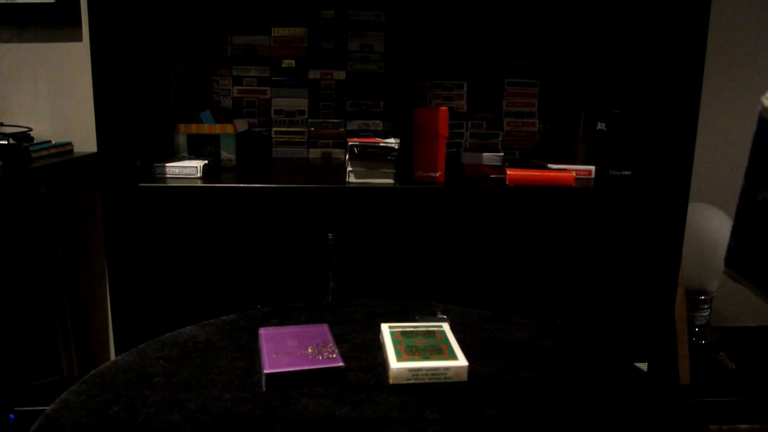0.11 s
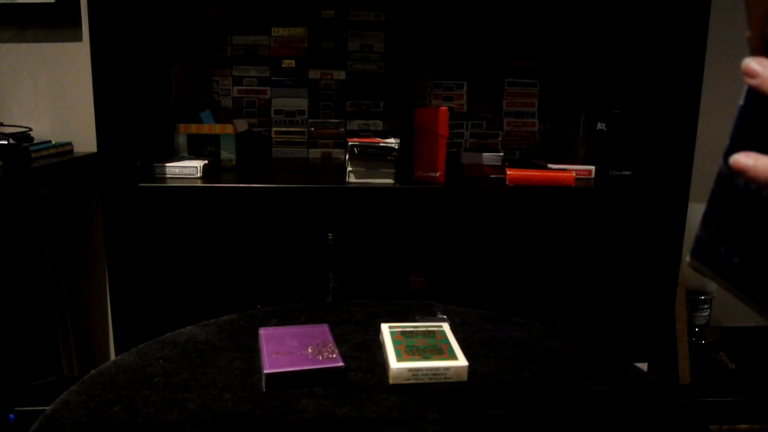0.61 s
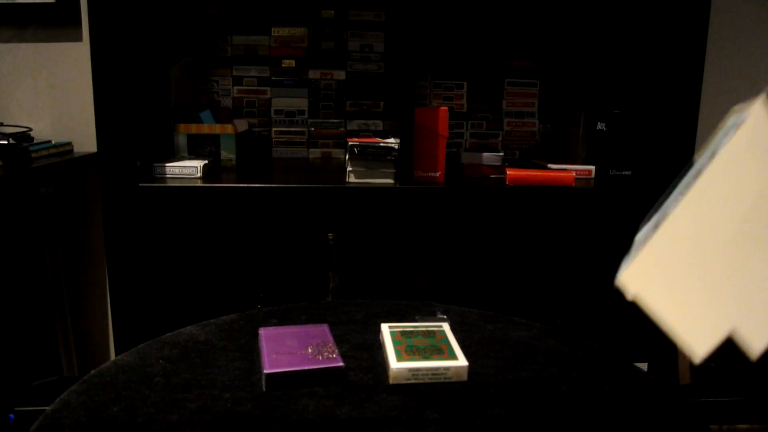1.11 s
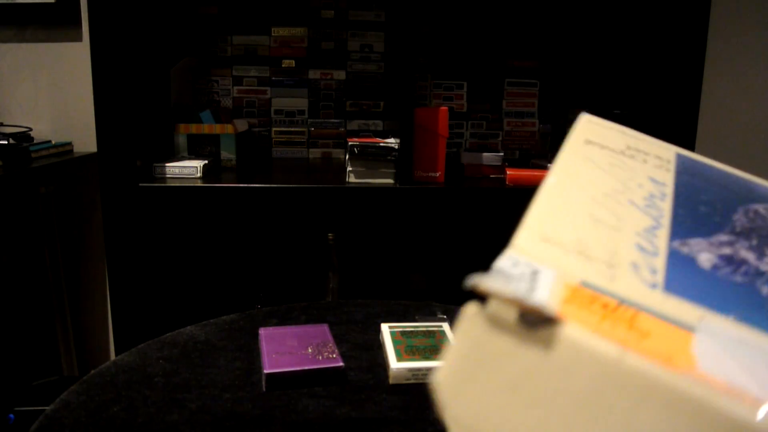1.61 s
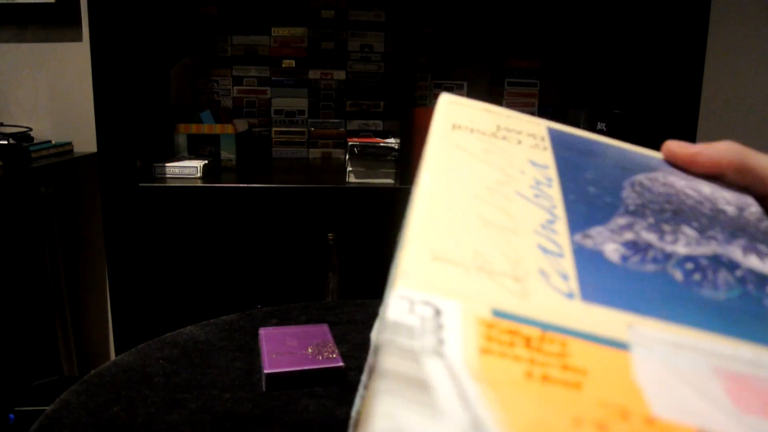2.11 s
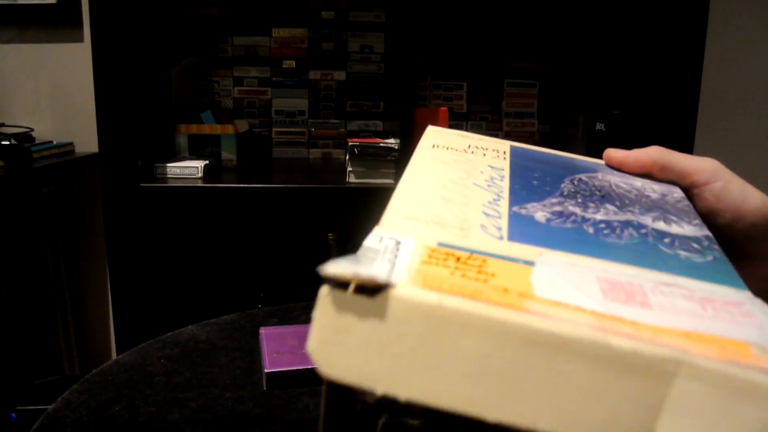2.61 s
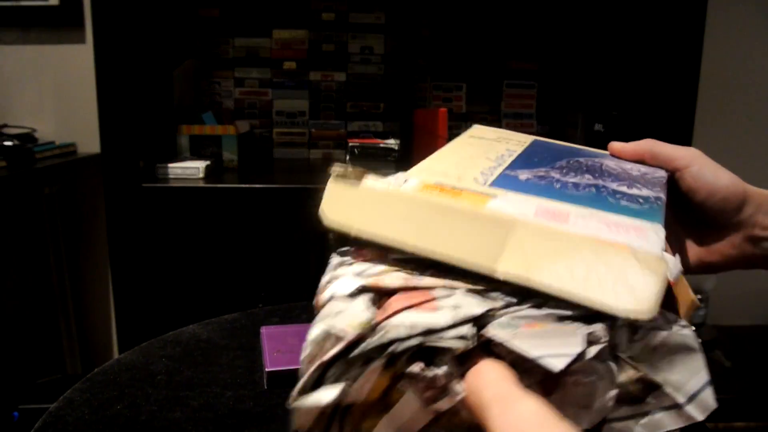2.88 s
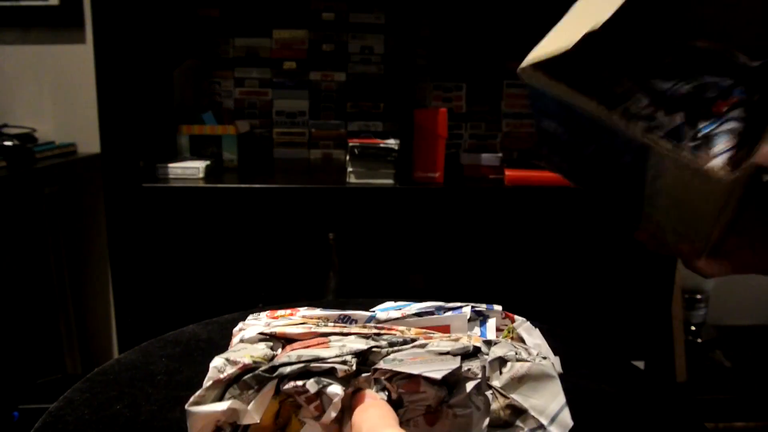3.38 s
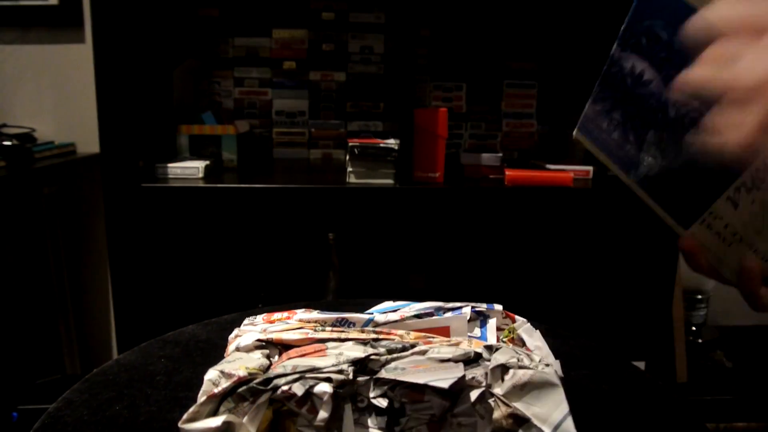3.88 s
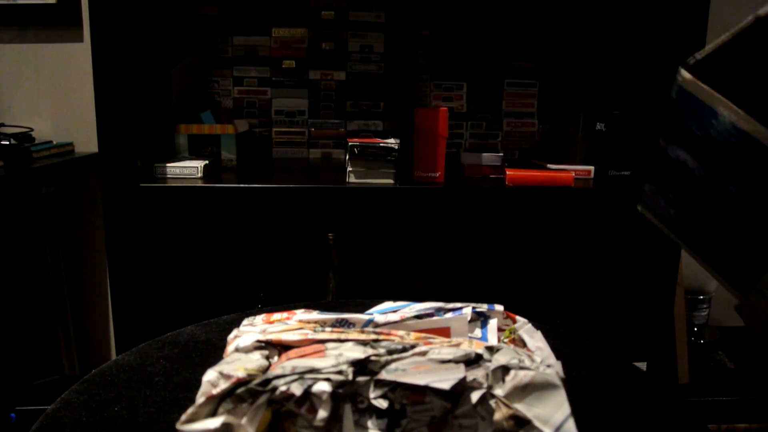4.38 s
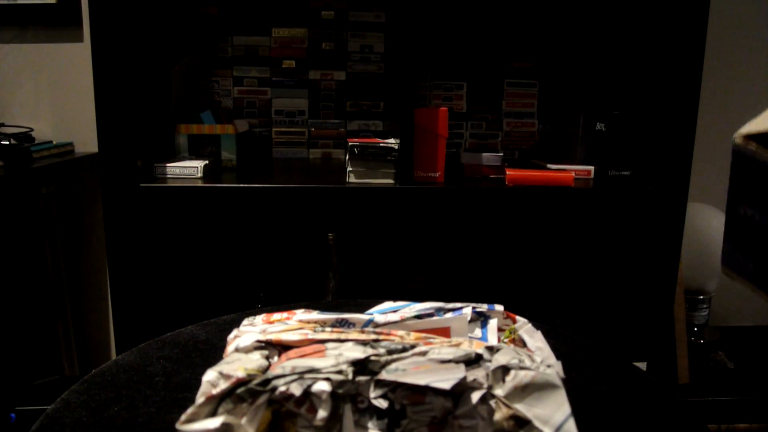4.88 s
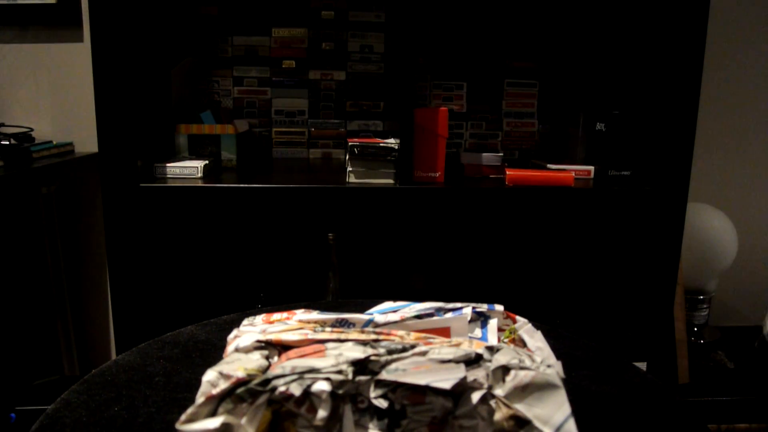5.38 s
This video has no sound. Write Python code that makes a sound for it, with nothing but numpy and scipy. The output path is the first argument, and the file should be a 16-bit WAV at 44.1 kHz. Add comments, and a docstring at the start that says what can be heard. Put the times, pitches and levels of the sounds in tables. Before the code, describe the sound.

A quiet indoor room with barely audible air, miked closely in stereo, sound leaning right. From 0 to 1 s a cardboard box is handled: faint dry rustles, small hollow knocks around 0.1, 0.3 and 0.8. A fuller bump comes at 1.1, then bright paper snaps near 1.26 and a crinkling cluster at 1.7. From 2 s crumpled newspaper is drawn out in a fine, irregular treble hiss, swelling until about 2.9, with hard crackles at 2.7-2.85. It drops off by 3.05, leaving light ticks and soft rustle, moving toward the middle, until 3.8. At 4.03 firm low-mid box knocks and a tiny groan start a rasping slide, with another bump at 4.28, fading by 4.5. After near silence, paper hiss returns at 4.75; from 5.0 to 5.5 hollow knocks, rough scrapes and rustles crowd together, strongest around 5.15 and 5.4, ending mid-movement.

```python
"""Paper hisses finely over card, a little right of the middle, close up in a quiet room.
A hand turns a cardboard box over and draws a wad of crumpled newspaper out of it, then slides the box aside.
Hiss and rustle are stick-slip noise, sheets snap and crackle as short rings, and scrapes and knocks
ring the modes of the hollow box, which also booms, thuds and groans.
Two close microphone ports hear the box come from the right to the middle and go back."""
import sys
import numpy as np
from scipy import signal
from scipy.io import wavfile
from scipy.ndimage import map_coordinates

SR = 44100
rng = np.random.default_rng(int(sys.argv[2]) if len(sys.argv) > 2 else 0)


def materialize(psi):
    """Save the field psi as 16-bit PCM at rate SR to the path in sys.argv[1].

    A 1-D psi becomes a single channel; in a 2-D psi each row is a channel.
    """
    bounded = np.clip(np.atleast_2d(psi).T, -1, 1)
    quanta = np.round(bounded * 32767).astype(np.int16)
    wavfile.write(sys.argv[1], SR, quanta)


def elevation(decibels):
    """Turn decibel levels (scalar or array-like) into linear amplitude ratios."""
    levels = np.asarray(decibels, float)
    return 10 ** (levels / 20)


N = 242792   # samples

# where the box is between the ports: [time_s, left_minus_right_db]
BOX_PLACE = [(0.0, -3.5), (0.32, -3.5), (1.03, -3.5), (1.85, -2.5), (2.47, -2), (3.5, -1), (3.9, 0.5),
             (4.0, -3.5), (5.5, -3.5)]
# spectrum of still air: [frequency_hz, relative_density_db]
AIR_SPECTRUM = [(15, -49), (25, -6), (510, -3), (1120, -6.5), (1730, -7), (3700, -12), (11600, -15.5),
                (15200, -18), (16500, -32)]
# power share that both ports hear alike: [frequency_hz, share_0_to_1]
PORT_LIKENESS = [(30, 0.3), (120, 0.069), (700, 0.56), (1500, 0.69), (3000, 0.61), (6000, 0.088),
                 (15000, 0.02)]
# spectrum of paper sliding on card: [frequency_hz, relative_density_db]
HISS_SPECTRUM = [(1800, -5.5), (3000, -5.5), (4500, 0.5), (6500, 1.5), (9000, 1.5), (12500, 3),
                 (15000, -3.5)]
# spectrum of flexing sheets: [frequency_hz, relative_density_db]
RUSTLE_SPECTRUM = [(400, -9.5), (600, -19), (900, -8.5), (1300, -7), (1700, -6.5), (2500, -5.5),
                   (4000, -8.5), (6000, -15.5), (11000, -22.5)]
# strokes of paper on card: [peak_s, hiss_db, swell_s, fade_s, rustle_against_hiss_db]
SLIDE_STROKES = [(0.0, -53.5, 0.022, 0.24, -1), (0.13, -51.5, 0.0034, 0.032, 9.5),
                 (0.306, -42.5, 0.089, 0.096, -3), (0.614, -48.5, 0.043, 0.18, -4),
                 (0.75, -46.5, 0.018, 0.043, 5.5), (0.852, -46.5, 0.11, 0.026, -10),
                 (0.799, -41, .006, 0.028, 1.5), (0.921, -51.5, 0.021, 0.02, 6.5),
                 (1.021, -32, 0.022, 0.011, -11.5), (1.05, -42, 0.056, 0.1, -7.5),
                 (1.093, -41, 0.0043, 0.11, 1.5), (1.221, -37, 0.046, 0.035, -2),
                 (1.265, -34.5, 0.0077, 0.036, -5), (1.4, -44.5, 0.087, 0.22, -6),
                 (1.478, -41.5, 0.044, 0.041, 2), (1.56, -43.5, 0.32, 0.099, -4),
                 (1.66, -44.5, 0.094, 0.097, -0.5), (1.709, -32.5, 0.023, 0.018, -1.5),
                 (1.749, -31.5, 0.036, 0.027, -4), (1.79, -52.5, .05, 0.18, -2.5),
                 (2.023, -27.5, 0.0029, 0.012, -24), (2.876, -22, 0.019, 0.026, -13.5),
                 (3.066, -45.5, 0.0058, 0.13, -0.5), (3.345, -38.5, 0.075, 0.08, 0),
                 (3.24, -46, 0.45, 0.82, -21), (3.58, -42.5, 0.36, 0.18, -4), (3.756, -49, .003, 0.014, 4),
                 (4.034, -39.5, 0.023, 0.073, 1.5), (4.62, -54.5, 0.089, 0.094, -7),
                 (4.778, -31.5, 0.027, 0.088, -4.5), (4.845, -31.5, 0.11, 0.058, -9),
                 (4.935, -42, 0.037, 0.06, -8.5), (5.003, -29, 0.0097, 0.08, -4.5),
                 (5.022, -31.5, 0.037, 0.13, 2), (5.167, -37, 0.25, 0.15, -2.5),
                 (5.26, -40.5, 0.025, 0.1, -36), (5.347, -43.5, 0.019, 0.19, -1.5),
                 (5.401, -31, 0.011, 0.12, -7), (5.44, -34.5, 0.032, 0.37, -19),
                 (5.5, -33, 0.083, 0.082, 7)]
# two long drags, the wad drawn out and the box slid aside, each a curve:
# [time_s, hiss_db, rustle_against_hiss_db, wall_rub_against_hiss_db]
LONG_DRAGS = [
    [(1.92, -69.5, 1, 9), (1.99, -45, 0.5, 4.5), (2.04, -42, -1, -2), (2.1, -42.5, 0.5, 3.5),
     (2.24, -36, -1.5, -0.5), (2.384, -36, -1.5, 1), (2.46, -32, -1.5, -3), (2.672, -29.5, -6.5, -9.5),
     (2.77, -29.5, -1, -6), (2.858, -32, -7.5, -8), (2.904, -39.5, -2.5, -1), (2.962, -35.5, -7.5, -37),
     (3.0, -50.5, -6, 6), (3.035, -56.5, -1, -5), (3.05, -82, -2, 0)],
    [(4.04, -38.5, -8, 11), (4.06, -39, -9, 7), (4.094, -28.5, -5.5, -6), (4.2, -31.5, -4, -14),
     (4.328, -32.5, -5, -14), (4.364, -39.5, -7, -11), (4.4, -37, 0.5, -1), (4.468, -49.5, -4, -46),
     (4.528, -51, -1.5, -4), (4.56, -73, 2, -8)],
]
# fingers and wad scraping the walls: [peak_s, drive_db, swell_s, fade_s, brightness_hz]
WALL_SCRAPES = [(0.03, -50, 0.17, 0.37, 590), (0.3, -38, 0.077, 0.088, 1900), (0.307, -32, 0.1, 0.077, 550),
                (0.429, -47, 0.14, 0.025, 312), (0.674, -54, 0.24, 0.17, 600),
                (0.755, -39, 0.032, 0.0097, 595), (0.795, -27, 0.008, 0.021, 516),
                (1.03, -46, 0.15, 0.034, 560), (1.09, -28.5, 0.0027, 0.11, 480),
                (1.278, -38, 0.049, 0.046, 630), (1.542, -39, 0.29, 0.17, 495),
                (1.741, -29, 0.11, 0.018, 515), (2.012, -52, 0.27, 0.052, 660),
                (2.724, -37, 0.034, 0.18, 704), (2.81, -30.5, 0.33, 0.17, 475),
                (3.018, -57, .06, 0.019, 316), (3.072, -45.5, 0.02, 0.072, 527),
                (3.2, -42.5, 0.014, 0.041, 480), (3.265, -40, 0.058, 0.02, 457),
                (3.333, -40, 0.053, 0.14, 505), (4.06, -37.5, 0.061, 0.34, 258),
                (4.125, -32, 0.051, 0.025, 337), (4.277, -23, 0.0071, 0.039, 464),
                (4.402, -34.5, 0.042, 0.039, 336), (4.951, -39, 0.019, 0.058, 250),
                (5.048, -33.5, 0.083, 0.13, 520), (5.14, -29, 0.015, 0.18, 425),
                (5.22, -23, 0.011, 0.042, 480), (5.299, -27.5, 0.03, 0.041, 420),
                (5.387, -18.5, 0.0058, 0.027, 513), (5.5, -18.5, 0.093, .1, 480)]
# modes of box walls and cavity: [frequency_hz, drive_db, t60_s]
BOX_MODES = [(137, -18, 0.04), (176, 2.5, 0.059), (212.6, -1.5, 0.14), (247.4, -4, 0.08), (287, 0.5, 0.077),
             (330, -1.5, 0.032), (425, -1.5, 0.046), (513, -4, 0.038), (600, -3.5, 0.063), (724, -1, 0.025),
             (844, 1.5, 0.015), (1030, -2.5, 0.026), (1255, -1.5, 0.013), (1900, -0.5, 0.014)]
# bumps on the box: [time_s, drive_db, brightness_hz, boom_against_drive_db]
BOX_KNOCKS = [(0.069, -28.5, 560, -29), (0.13, -18.5, 660, -31), (0.178, -29, 600, -17),
              (0.302, -15.5, 600, -32), (0.322, -23.5, 600, -28), (0.396, -30.5, 540, -18),
              (0.795, -25, 477, -13.5), (0.803, -24, 575, -29), (0.887, -26.5, 600, -11),
              (0.915, -17, 553, -15), (1.092, -10.5, 508, -14), (1.096, -39, 530, -26),
              (1.211, -22, 470, -16), (1.265, -24, 600, -15), (1.466, -27, 413, -22),
              (1.712, -18.5, 442, -30), (1.742, -25.5, 600, -29), (2.757, -12, 935, -31),
              (2.826, -34, 280, -20), (3.002, -36.5, 231, -9), (4.005, -16.5, 360, -9),
              (4.031, -10.5, 534, -13), (4.036, -10, 241, -6), (4.2755, -16, 515, -12),
              (4.942, -23, 514, -4), (5.002, -24, 433, -12), (5.05, -14.5, 700, -16), (5.128, -20, 432, -6),
              (5.133, -6.5, 480, -12.5), (5.164, -6.5, 477, -24), (5.177, -12, 506, -29),
              (5.217, -15, 540, -24), (5.254, -23, 600, -28), (5.291, -16, 580, -20), (5.346, -25, 486, -7),
              (5.386, -10.5, 450, -20), (5.475, -9, 464, -12)]
# creases letting go: [time_s, ring_peak_db, ring_hz, burst_t60_s, crack_against_ring_less_15_db]
CREASE_SNAPS = [(0.073, -38.5, 1260, 0.029, -13.5), (0.1279, -34, 1120, 0.043, -34),
                (0.18, -30, 1270, 0.013, -16.5), (0.3995, -49, 1800, 0.17, -5.5),
                (0.7458, -32, 930, 0.048, -29), (0.795, -35, 1900, 0.02, -11),
                (0.844, -42, 6330, 0.014, -6), (0.8878, -54, 1050, 0.052, 5.5),
                (0.9151, -29, 1380, 0.077, -17.5), (1.021, -19, 6450, 0.0063, -38),
                (1.064, -40, 2170, 0.01, -5), (1.0927, -20.5, 1130, 0.011, -14),
                (1.201, -28.5, 2430, 0.013, -17), (1.2155, -24, 2200, 0.023, -27),
                (1.223, -25, 2800, 0.006, -22), (1.2595, -12.5, 2860, 0.0053, -17),
                (1.2641, -25, 3350, 0.027, -20), (1.2661, -19, 2450, 0.015, -18),
                (1.4694, -25.5, 2870, 0.013, -7.5), (1.5488, -28, 950, 0.0053, -16),
                (1.6382, -33.5, 2580, 0.011, -24), (1.6965, -31, 1360, 0.0037, -21),
                (1.7035, -18, 3700, 0.0099, -29), (1.7078, -16.5, 1900, 0.018, -40),
                (1.7392, -19, 1000, 0.013, -22), (1.7515, -14.5, 4360, 0.01, -20.5),
                (1.9882, -32, 2190, 0.016, -15), (2.0225, -21, 3520, 0.007, -32),
                (2.0228, -21.5, 2170, 0.0093, -27), (2.73, -8.5, 990, 0.0032, -26),
                (2.8036, -14, 900, 0.0071, -30), (2.8032, -16, 4300, 0.012, -17),
                (2.829, -20, 4500, 0.014, -17), (2.848, -16, 960, 0.007, -20),
                (2.8696, -30, 5500, 0.0076, -40), (3.071, -32.5, 4200, 0.021, -26),
                (3.1027, -31, 2300, 0.022, -14), (3.119, -34, 2500, 0.008, -22),
                (3.186, -33, 1290, 0.016, 4), (3.222, -36, 2500, 0.013, -21),
                (3.351, -24, 3580, 0.003, -23), (3.414, -35, 2970, 0.0039, -9),
                (3.428, -41, 4500, 0.0067, -18), (3.7524, -29, 6600, 0.012, -15),
                (4.008, -42, 1270, 0.02, -6.5), (4.0314, -28, 1030, 0.021, -16),
                (4.0415, -13, 1300, 0.022, -26), (4.2755, -19.5, 1350, 0.03, -16),
                (4.2825, -22, 2400, 0.012, -16), (4.3988, -25.5, 2240, 0.027, -12),
                (4.6142, -54.5, 1390, 0.019, 9.5), (4.657, -41, 1680, 0.045, -11),
                (4.768, -32, 2000, 0.015, -12), (4.779, -22, 6360, 0.018, -19),
                (4.8408, -19.5, 7500, 0.0068, -16), (4.932, -36, 8000, 0.02, -17),
                (5.0506, -14, 1710, 0.022, -31), (5.13, -26, 1130, 0.026, -8),
                (5.164, -27.5, 1520, 0.025, -11), (5.2161, -26, 1030, 0.051, -25),
                (5.292, -34, 1070, 0.066, -31), (5.3218, -35.5, 1560, 0.038, -12),
                (5.347, -43, 2280, 0.018, 2.5), (5.3875, -31.5, 1925, 0.35, -5.5),
                (5.4942, -15, 1620, 0.019, -29)]
# the whole box shoved, pushing air: [time_s, drive_db]
BOX_THUDS = [(0.075, -32), (1.091, -20), (1.707, -34), (2.827, -30), (5.001, -28), (5.467, -22)]
# gripped wall bending: [start_s, length_s, from_hz, to_hz, level_db]
WALL_GROANS = [(0.235, 0.049, 190, 186, -42.5), (0.39, 0.041, 185, 209, -51.5),
               (4.049, 0.077, 200, 320, -39), (4.277, 0.058, 190, 185, -42.5),
               (5.207, 0.077, 175, 205, -37.5)]

STROKE_SPAN_DB = 20   # swell and fade times cover this much
STEP = 32   # samples between values of a stroke envelope


def rms_one(x):
    """Scale to rms 1."""
    return x / np.sqrt(np.mean(x ** 2) + 1e-20)


def in_time(rows):
    """Columns of a curve, one value per sample."""
    s, *columns = np.transpose(rows)
    return [np.interp(np.arange(N) / SR, s, column) for column in columns]


def at_hz(points, hz):
    """Read a spectrum on a log-frequency axis."""
    known_hz, value = np.transpose(points)
    return np.interp(np.log(hz), np.log(known_hz), value)


def highpass(x, order, hz):
    """Butterworth filter that takes away what lies below hz."""
    return signal.sosfilt(signal.butter(order, hz, "high", fs=SR, output="sos"), x)


def drift(rate_hz):
    """Slow random wander of spread 1, drawn every 40 samples."""
    r = np.exp(-80 * np.pi * rate_hz / SR)
    noise = rng.standard_normal(N // 40 + 2002)
    slow = rms_one(signal.lfilter([1], [1, -2 * r, r * r], noise)[2000:])
    return np.interp(np.arange(N) / 40, np.arange(len(slow)), slow)


def ring(clicks, hz, t60):
    """A click sets a resonance going: a dying sine in proportion to the click."""
    r, w = elevation(-60 / (t60 * SR)), 2 * np.pi * hz / SR
    return signal.lfilter([0, np.sin(w)], [1, -2 * r * np.cos(w), r * r], clicks + 1e-18)


def slips(per_s, spread_db, smooth):
    """Stick-slip clicks of uneven size over smooth friction noise: two sets of three unrelated contact spots."""
    slipping = rng.random(N) < per_s / SR
    sizes = elevation(spread_db * np.minimum(rng.exponential(1, N), 4)) * slipping
    return np.sqrt(rms_one(sizes) ** 2 + smooth ** 2) * rng.standard_normal((2, 3, N))


def coloured(source, spectrum, patchy_db):
    """Third-octave bands, each with its level, flicker and share common to both ports; rms 1."""
    out, together = 0, drift(25)
    edges = 16500 / 2 ** np.arange(9.4, -.1, -1 / 3)
    for k, (low, high) in enumerate(zip(edges, edges[1:])):
        hz = np.sqrt(low * high)
        if hz <= spectrum[0][0]:
            continue
        band = signal.butter(2, [low, high], "band", fs=SR, output="sos")
        both, left, right = signal.sosfilt(band, source[k % 2])   # neighbours carry unrelated noise
        alike = np.clip(at_hz(PORT_LIKENESS, hz), 0, 1)
        gain = elevation(at_hz(spectrum, hz) + patchy_db * (together + 0.67 * drift(39)))
        out = out + gain * (np.sqrt(alike) * both + np.sqrt(1 - alike) * np.array([left, right]))
    return rms_one(out)


def strokes(rows):
    """Power of each stroke over time, one row a stroke: even in dB up to the peak and down again."""
    s, db, swell, fade = np.array(rows)[:, :4, None].transpose(1, 0, 2)
    t = np.arange(0, N + STEP, STEP) / SR - s
    away = np.where(t < 0, -t / swell, t / fade)
    return elevation(2 * (db - STROKE_SPAN_DB * away))


def height(power):
    """Amplitude per sample from power given every STEP samples."""
    return np.interp(np.arange(N) / STEP, np.arange(len(power)), np.sqrt(power))


def still_air():
    """Faint broadband noise of the quiet room, softly flickering, at -60 dB rms."""
    return elevation(-60) * coloured(rng.standard_normal((2, 3, N)), AIR_SPECTRUM, patchy_db=1.5)


def handling():
    """Amplitudes of hiss, rustle and wall rub: strokes and long drags add in power."""
    power, t = strokes(SLIDE_STROKES), np.arange(N) / SR
    hiss = height(power.sum(axis=0))
    rustle = height(elevation(2 * np.array(SLIDE_STROKES)[:, 4]) @ power)
    dragging = sum((t > drag[0][0]) & (t < drag[-1][0]) for drag in LONG_DRAGS)
    pull_db, rustle_db, wall_db = in_time(np.concatenate(LONG_DRAGS))
    drag = dragging * elevation(pull_db)
    sliding = np.hypot(hiss, drag)
    flexing = np.hypot(rustle, drag * elevation(rustle_db))
    wall_rub = np.hypot(rustle * elevation(-12), drag * elevation(wall_db))   # rustling sheets also shake the walls
    return sliding, flexing, wall_rub


def paper_hiss(sliding):
    """Paper slides on card: dense stick-slip friction, mostly treble."""
    return sliding * coloured(slips(2900, spread_db=1.5, smooth=1.52), HISS_SPECTRUM, patchy_db=1.4)


def paper_rustle(flexing):
    """Sheets flex: sparser, more uneven slips with more of the middle range."""
    return flexing * coloured(slips(1600, spread_db=2.5, smooth=1.3), RUSTLE_SPECTRUM, patchy_db=0.6)


def crackle(flexing):
    """Small creases tick at random while the sheets flex, each at a side and one of twelve pitches."""
    per_s, least_db, ring_cycles = 280, -2.5, 9.7   # least size is against the rustle, t60 in cycles
    ticking = rng.random(N) < per_s / SR
    sizes = elevation(least_db + 2.0 * np.minimum(rng.exponential(1, N), 2)) * ticking
    side_db = 4.0 * rng.uniform(-1.8, 1, N) * [[1], [-1]]   # leans to the right
    ticks, dealt = flexing * sizes * elevation(side_db), rng.integers(0, 12, N)
    rings = 0
    for k, hz in enumerate(np.geomspace(900, 9000, 12)):
        rings = rings + ring(ticks * (dealt == k), hz, ring_cycles / hz)
    return highpass(rings, 2, 500)


def box_modes(forces):
    """The walls and cavity ring, one force a mode, with alternating sign."""
    out = np.zeros(N)
    for k, ((hz, _, t60), force) in enumerate(zip(BOX_MODES, forces)):
        out += ring(force, hz, t60) * (-1) ** k
    return out


def scrapes(wall_rub):
    """Rubbing friction drives the box, favouring the modes near each scrape's brightness."""
    power, rubbing = strokes(WALL_SCRAPES), slips(700, spread_db=0.0, smooth=0.62)[0, 0]
    scrape_hz, rub_hz = np.array(WALL_SCRAPES)[:, 4], 640
    forces = []
    for hz, level_db, t60 in BOX_MODES:
        near = elevation(-11.0 * np.abs(np.log2(hz / scrape_hz)))   # dB per octave away
        near_rub = elevation(-11.0 * np.abs(np.log2(hz / rub_hz)))
        pressure = np.hypot(height(near ** 2 @ power), near_rub * wall_rub)
        # long-ringing modes gather more noise, so they are driven less
        forces.append(rubbing * pressure * elevation(level_db) / np.sqrt(t60 * SR / 4))
    return box_modes(forces)


def knocks():
    """Soft bumps strike the modes near their brightness, and a drawn-out push makes the cavity boom."""
    s, drive_db, bright_hz, boom_db = np.transpose(BOX_KNOCKS)
    at = np.round(s * SR).astype(int)
    forces, booms = np.zeros((len(BOX_MODES), N)), np.zeros(N)
    for force, (hz, level_db, _) in zip(forces, BOX_MODES):
        off_db = 30.0 * np.abs(np.log2(hz / bright_hz))
        luck_db = rng.normal(0, 2.0, len(at))
        force[at] = elevation(drive_db + level_db - 7 - off_db + luck_db)
    soft = np.exp(-1 / (0.004 * SR))   # contact of 4 ms
    booms[at] = elevation(drive_db + boom_db)
    booms = highpass(signal.lfilter([3 * (1 - soft)], [1, -soft], booms), 2, 130)
    return box_modes(forces) + ring(booms, 226.6, 0.065)


def snaps():
    """Each crease lets go with a short ring at its own pitch and a burst of bright crack."""
    size = 4000
    out, t = np.zeros((2, N + size)), np.arange(size) / SR
    for s, peak_db, hz, t60, crack_db in CREASE_SNAPS:
        chance = rng.standard_normal((3, size))
        burst = chance[0] + 1.1 * chance[1:]   # partly alike at both ports
        burst *= (1 - np.exp(-t / 0.00013)) * elevation(-60 * t / t60)
        crack = highpass(burst * elevation(-40 * t / t60), 1, 2000)   # the treble dies first
        burst[:, 2] += 8.2 * np.sign(chance[0, 0])   # the hard first break
        tone = ring(np.diff(burst, prepend=0), hz, 2.8 / hz + 0.25 * t60)
        tone = tone / np.abs(tone).max()
        crack = elevation(crack_db + 15.0) * crack / np.abs(crack).max()
        at = round(s * SR)
        out[:, at:at + size] += elevation(peak_db) * (tone + crack)
    return highpass(out[:, :N], 2, 500)   # small creases push no bass


def thuds():
    """The whole box pushes air: a low, very short ring."""
    s, drive_db = np.transpose(BOX_THUDS)
    pushes = np.zeros(N)
    pushes[np.round(s * SR).astype(int)] = elevation(drive_db)
    return ring(pushes, 121, 0.0084)


def groans():
    """A gripped wall hums as it bends, at a gliding pitch with an unsteady strength."""
    out, t = np.zeros(N), np.arange(N) / SR
    for s, length, from_hz, to_hz, db in WALL_GROANS:
        done = np.clip((t - s) / length, 0, 1)
        phase = 2 * np.pi * np.cumsum(from_hz + (to_hz - from_hz) * done ** 2) / SR
        out += elevation(db) * np.sqrt(np.abs(np.sin(np.pi * done))) * np.sin(phase)
    return out * elevation(0.68 * drift(55))


def room(x):
    """Eight feedback delays a side, duller on every round."""
    t60_s, wall_cut_hz = 0.21, 5600   # t60 of the lows, the treble dies sooner
    out, dull = np.zeros((2, N)), np.exp(-2 * np.pi * wall_cut_hz / SR)
    for k, lag in enumerate((rng.uniform(0.008, 0.025, 16) * SR).astype(int)):
        loop, gain, state = x.copy(), elevation(-60 * lag / SR / t60_s), [0.]
        for i in range(lag, N, lag):
            back, state = signal.lfilter([gain * (1 - dull)], [1, -dull], loop[i - lag:i], zi=state)
            loop[i:i + lag] += back[:N - i]
        out[k % 2] += (loop - x) * (-1) ** (k // 2)
    echo = out.mean(axis=0)
    # long waves reach both close ports alike, only short ones differ
    return echo + highpass(out - echo, 1, 1500)


def place(sound):
    """The port farther from the box hears it weaker and a few samples later."""
    left, right = sound
    pan_db, = in_time(BOX_PLACE)
    lead = 1.24 * pan_db   # samples the left port leads, 1.24 for each dB
    left = map_coordinates(left, [np.arange(N) + lead], order=3, mode="nearest")
    return np.array([left * elevation(pan_db / 2), right * elevation(-pan_db / 2)])


def scene():
    """Paper and box with the room's answer, placed between the ports, over still air."""
    air = still_air()
    sliding, flexing, wall_rub = handling()
    friction = paper_hiss(sliding) + paper_rustle(flexing)
    box = scrapes(wall_rub) + knocks() + thuds() + groans()
    blows = crackle(flexing) + snaps() + box
    echo = elevation(-17.5) * room(blows.mean(axis=0))
    return place(friction + blows + echo) + air


def top_cut(x):
    """Nothing passes above the cut-off."""
    return signal.sosfilt(signal.butter(12, 16670, fs=SR, output="sos"), x)


def record(dry):
    """A small two-port microphone that drops the deep bass, its left port brighter, its right duller."""
    thin = highpass(dry, 2, 65)
    mix = thin + [[0.25], [-0.1]] * highpass(thin, 1, 9000)
    return top_cut(mix)


dry = scene()
out = record(dry)
materialize(out)
```